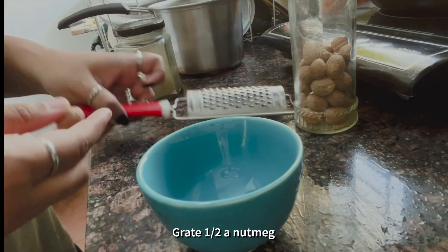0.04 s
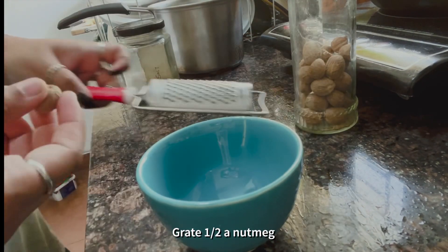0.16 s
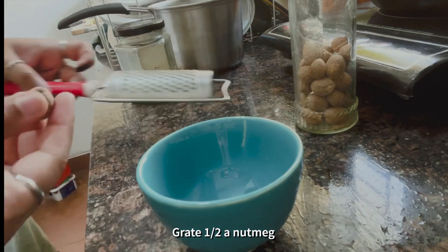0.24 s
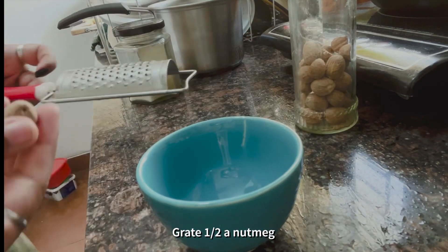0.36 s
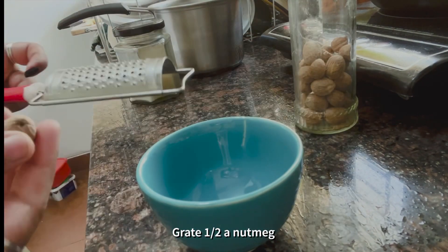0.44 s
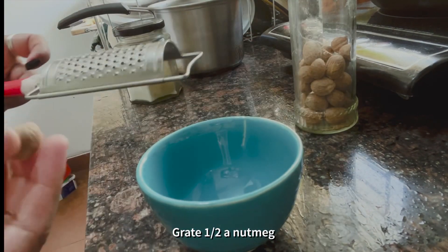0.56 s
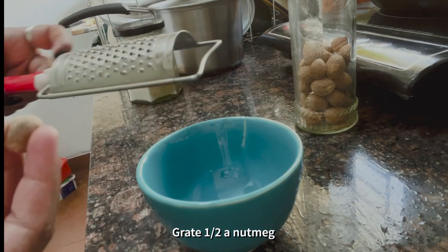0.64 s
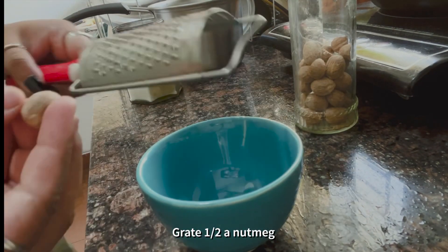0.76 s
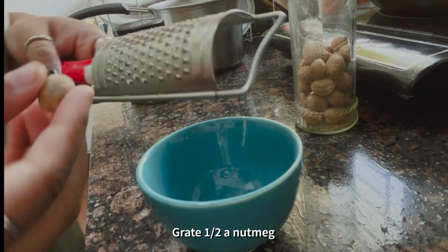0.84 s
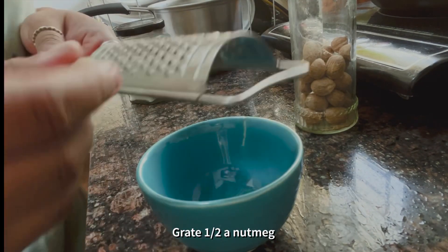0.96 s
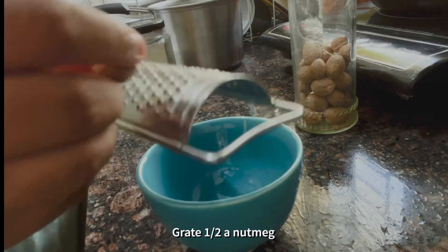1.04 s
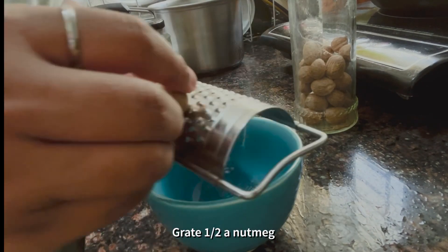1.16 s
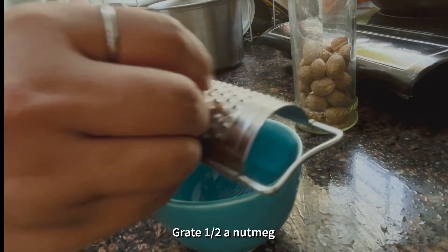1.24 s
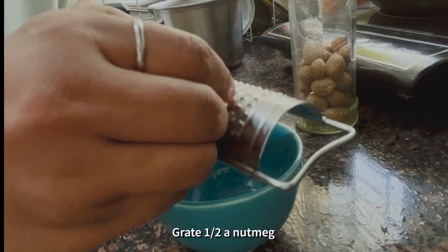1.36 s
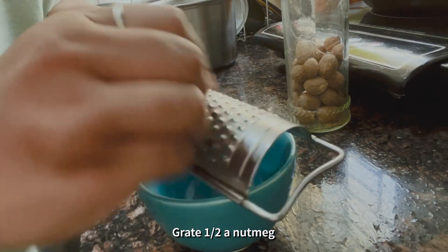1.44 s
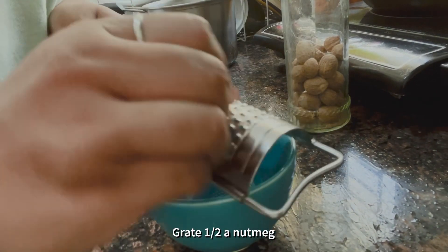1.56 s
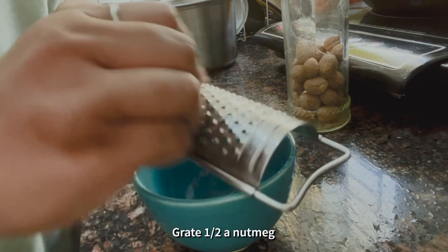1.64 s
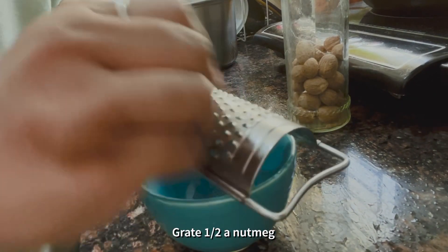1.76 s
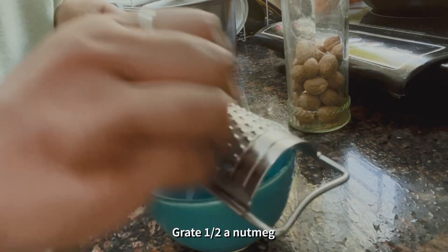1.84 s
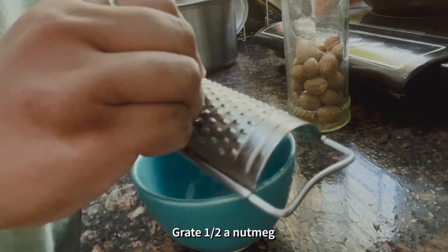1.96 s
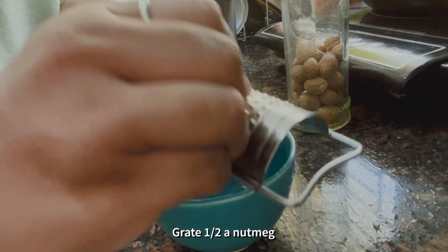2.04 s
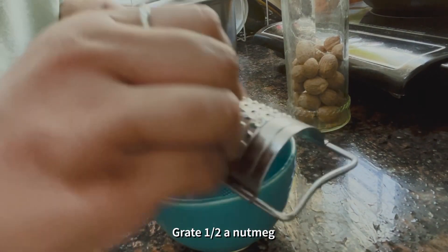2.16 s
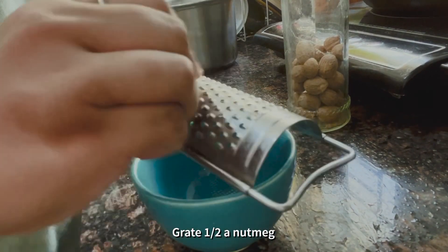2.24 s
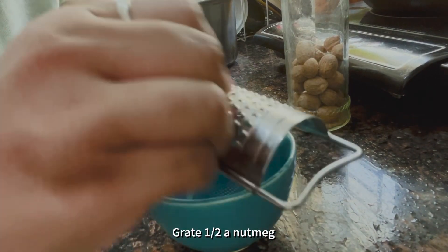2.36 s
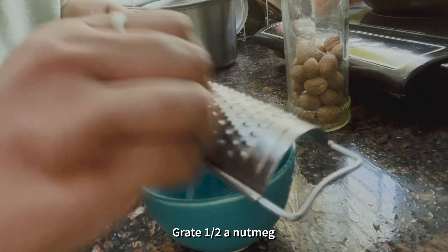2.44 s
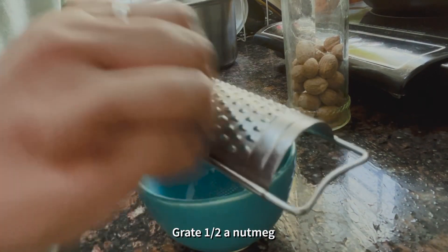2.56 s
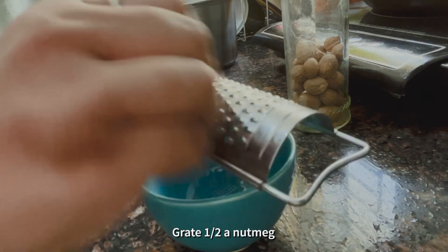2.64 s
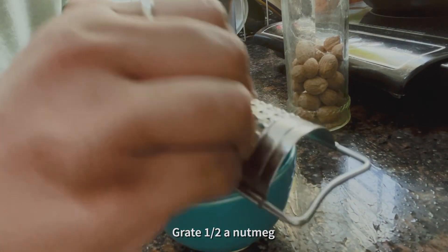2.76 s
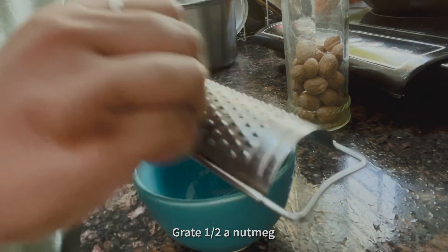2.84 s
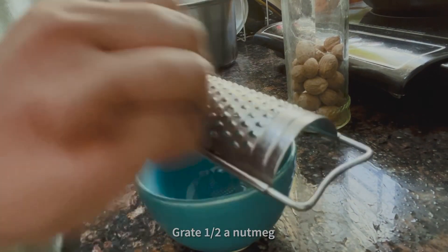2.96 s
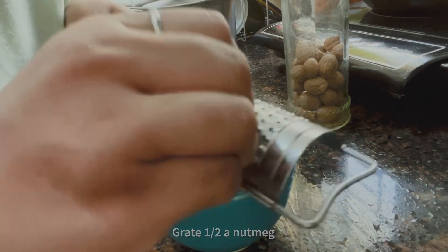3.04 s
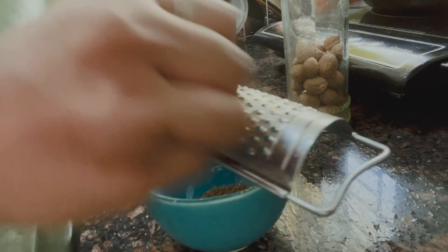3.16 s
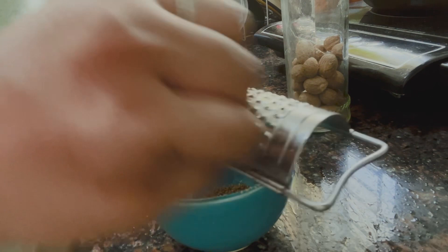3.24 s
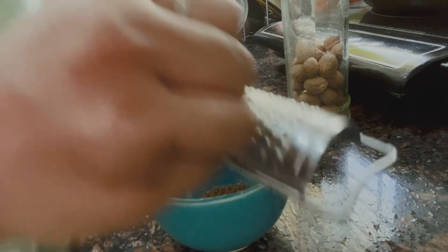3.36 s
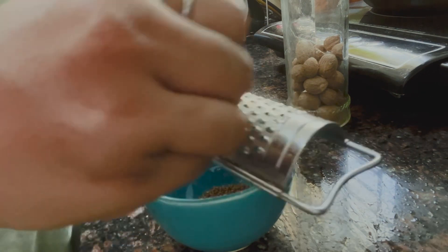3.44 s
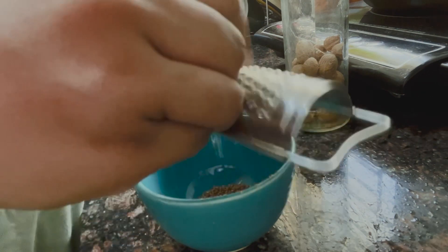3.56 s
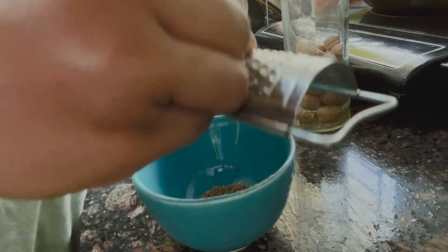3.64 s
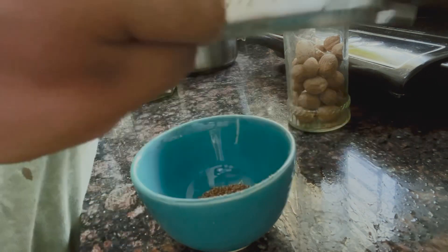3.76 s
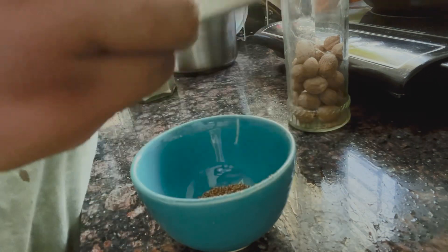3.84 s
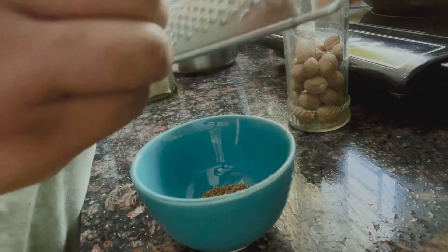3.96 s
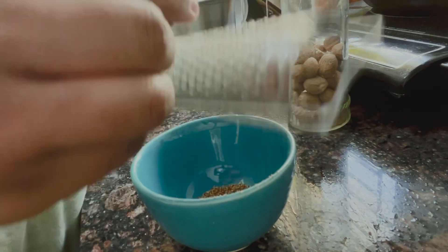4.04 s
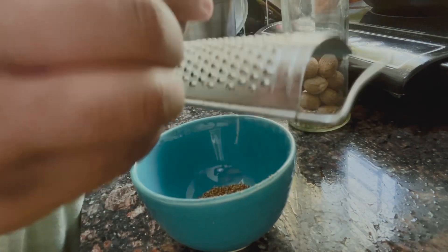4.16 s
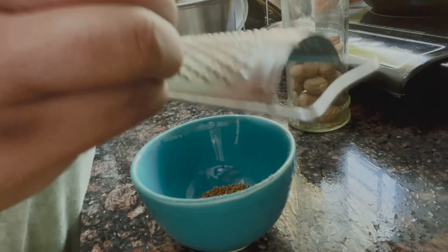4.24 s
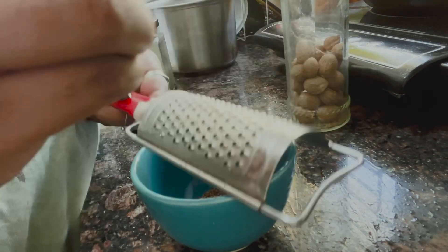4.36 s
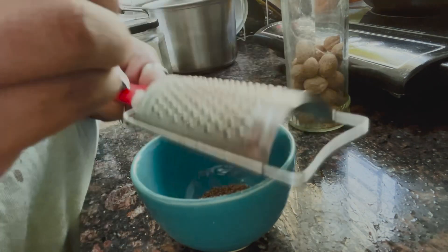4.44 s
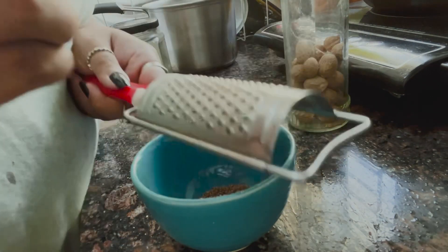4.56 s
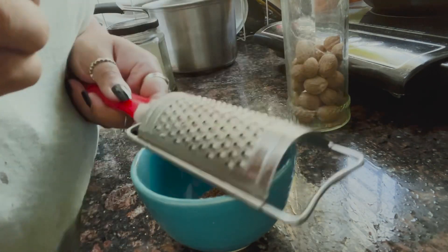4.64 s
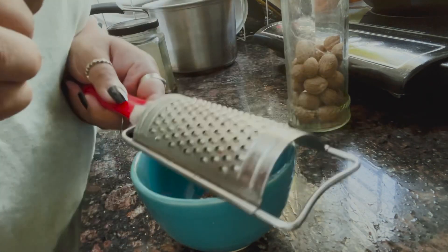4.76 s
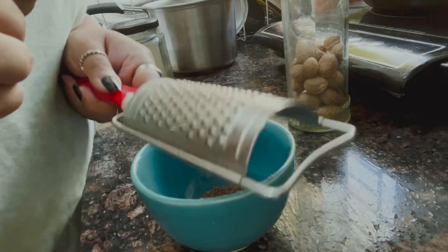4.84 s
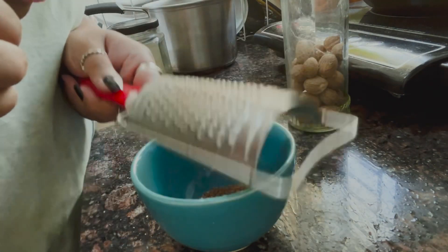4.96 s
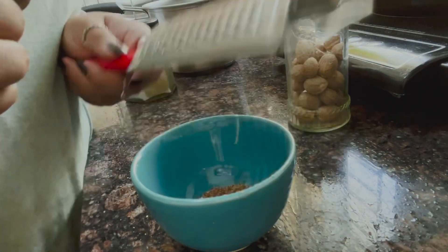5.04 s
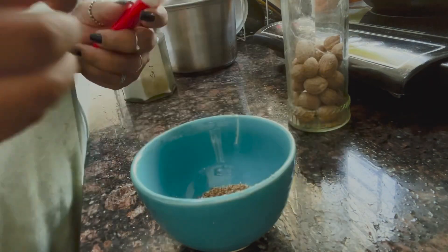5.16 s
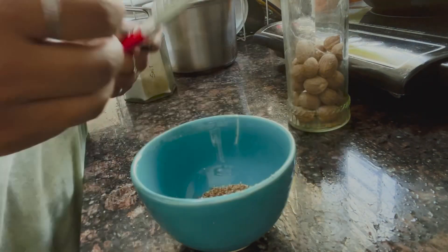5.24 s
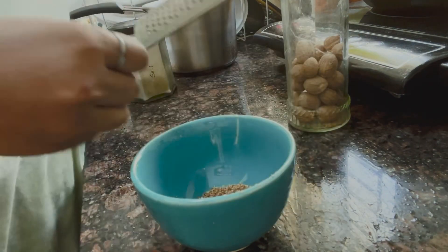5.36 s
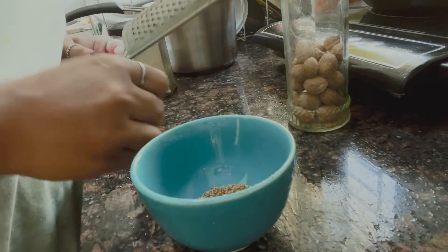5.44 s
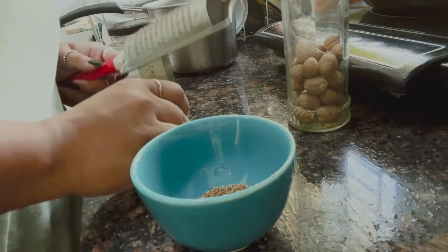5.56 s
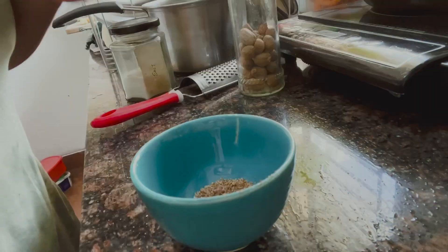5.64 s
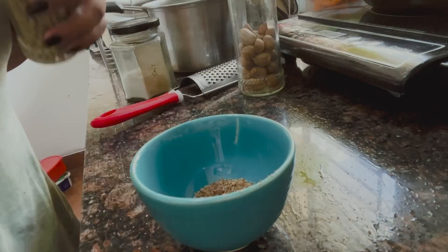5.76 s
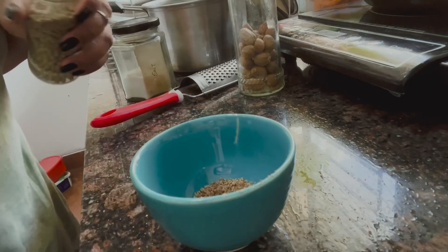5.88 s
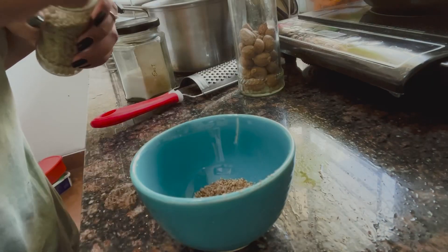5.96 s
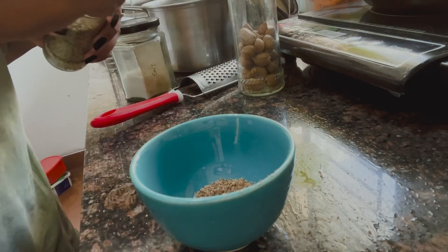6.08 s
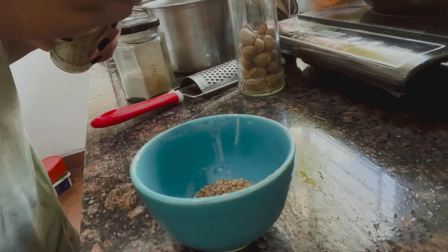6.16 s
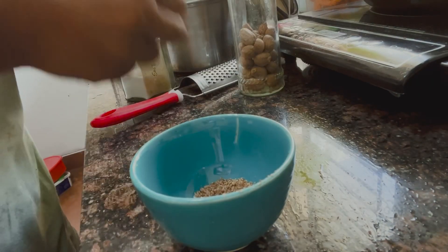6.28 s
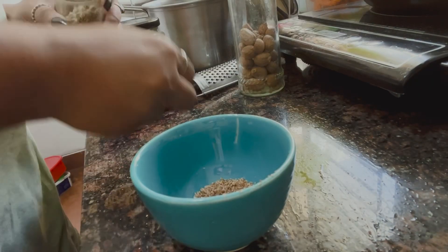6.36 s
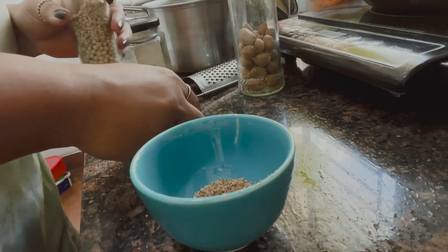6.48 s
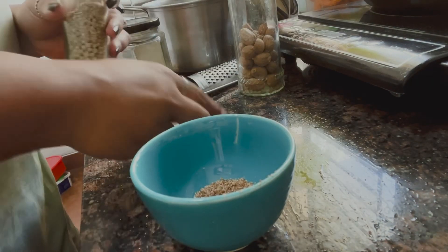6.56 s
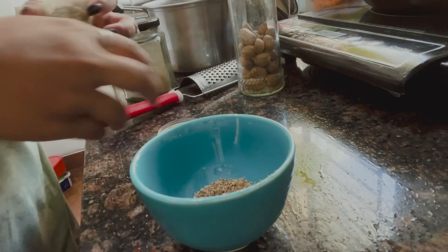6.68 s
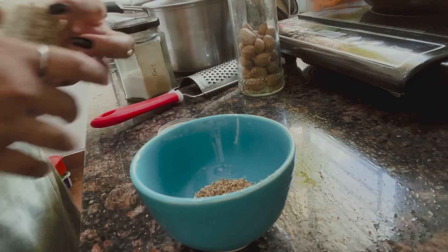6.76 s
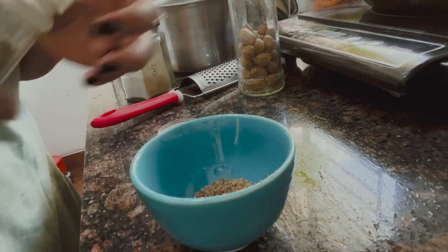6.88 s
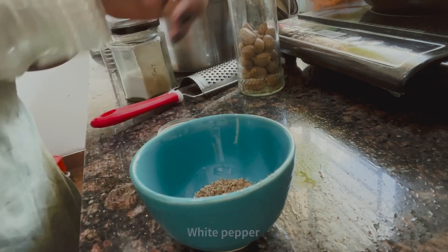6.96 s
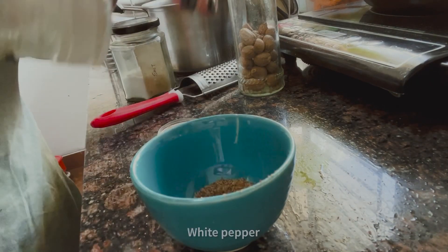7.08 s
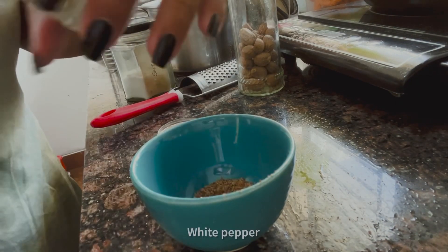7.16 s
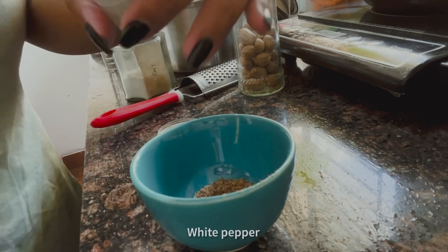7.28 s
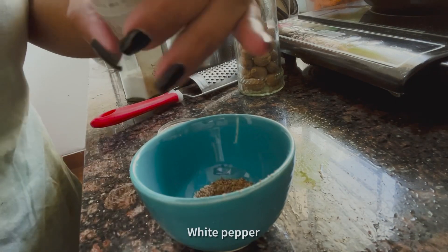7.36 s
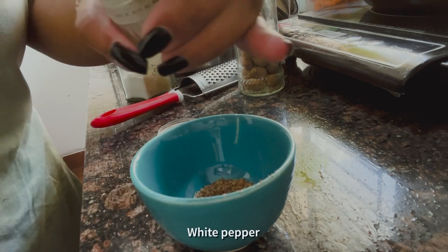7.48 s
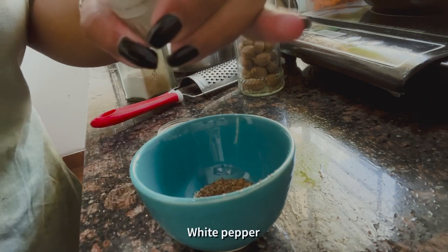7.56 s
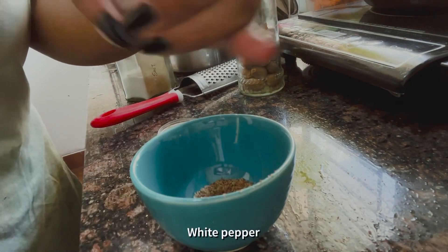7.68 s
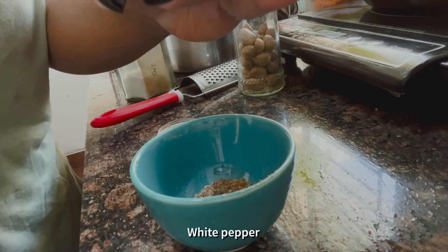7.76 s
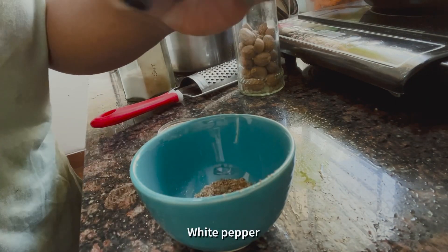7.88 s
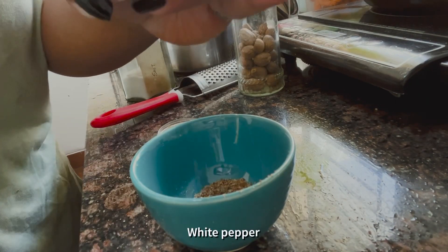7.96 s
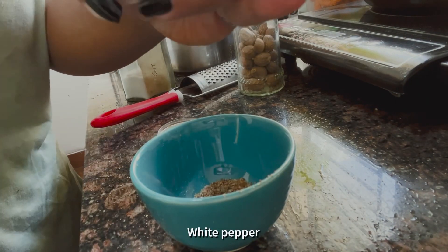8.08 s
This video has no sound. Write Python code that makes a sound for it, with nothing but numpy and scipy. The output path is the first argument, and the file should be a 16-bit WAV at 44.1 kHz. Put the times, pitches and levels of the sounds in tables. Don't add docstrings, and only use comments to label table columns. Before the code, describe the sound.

Close stereo pickup at a kitchen counter: a bright metallic bounce on stone, then about two seconds of fast, dry, gritty grating on thin metal, with catches and a few clanks against a ceramic bowl. Evenly spaced rim taps follow, then a metal clack as the grater is put down. Glass ticks, dull jar thuds and a lid rattle lead into a pepper mill's irregular cracks and thin squeaks, over faint low room rumble.

```python
import sys
import numpy as np
from scipy import signal
from scipy.fft import rfft, irfft, next_fast_len
from scipy.io import wavfile
from scipy.ndimage import uniform_filter1d

SR = 44100
rng = np.random.default_rng(int(sys.argv[2]) if len(sys.argv) > 2 else 0)


def dump_mix(stems):
    frames = np.atleast_2d(stems).T
    limited = np.clip(frames, -1, 1)
    pcm = np.round(limited * 32767).astype(np.int16)
    wavfile.write(sys.argv[1], SR, pcm)


def linear_from_db(decibels):
    return 10 ** (np.asarray(decibels, float) / 20)


N = 358091

# (frequency [Hz], density [dB per Hz])
RUMBLE_SPECTRUM = [(76, -7.5), (130, -4), (330, -4), (372, -6.5), (612, -11), (756, -14.5), (1310, -15),
                   (1750, -23), (3000, -27.5), (3900, -42), (6600, -120)]
# (frequency [Hz], likeness [0..1])
RUMBLE_LIKENESS = [(60, 1), (130, 1), (290, 0.77), (640, 0.013), (3000, 0.054)]
# (frequency [Hz], level [dB])
THRUM_SPECTRUM = [(15, -47.5), (30, -15), (70, -3), (100, 2.5), (125, -7.5), (170, -11.5), (400, -73)]
# (frequency [Hz], level [dB])
HISS_SPECTRUM = [(500, 6), (1500, -4), (3000, -1.5), (5000, -6.5), (8000, -8.5), (12000, -19), (14000, -21),
                 (16000, -26)]
# (time [s], level [dB])
LOAD = [(0, -48), (0.298, -46), (1.5, -44), (1.899, -40.5), (3.2, -45.5), (3.501, -49.5), (4.0, -49),
        (4.401, -58.5), (8.12, -52)]
# (time [s], length [s], level [dB])
RUSTLES = [(0, 0.023, -51), (1.6, 0.14, -72), (4.5, 0.29, -50), (6.2, 0.56, -55), (7.6, 0.36, -58)]
RUMBLE_DB, HISS_DB = -44.5, -57.5
HIGH_TONE_HZ, HIGH_TONE_DB = 14420, -81
LOAD_SHARE = 0.069
RUSTLE_RISE_DB_PER_S, RUSTLE_FALL_DB_PER_S = 100, 65

# (time [s], level [dB], ring level [dB], contact [s])
STONE_HITS = [
    (0.053, -6, -5.5, 0.0058),
    (0.0605, -14, 4, 0.0078),
    (0.066, -16.5, 1.5, 0.0072),
    (0.072, -19, -3, 0.01),
]
# (frequency [Hz], level [dB], t60 [s])
FRAME_MODES = [(596, -2.5, 0.065), (930, 1, 0.037), (2046, 0.5, 0.038), (1134, -0.5, 0.021),
               (2550, -11, 0.036), (4220, -14.5, 0.078), (4800, -16, 0.047), (5600, -7, 0.05),
               (6700, -18, 0.041), (8820, 7.5, 0.052), (9400, -12, 0.051), (10650, -17, .06),
               (11100, -11, 0.07)]
# (frequency [Hz], level [dB])
SLAP_SPECTRUM = [(300, -11.5), (1000, -10.5), (2700, -18), (5600, -9), (9000, -7), (11500, -8),
                 (13000, -20), (16500, -24.5)]
TWANG = 0, 0.34, 606.5, -17.5

# (time [s], force [dB], length [s], favoured pitch of the tin [Hz])
STROKES = [(1.439, -21, 0.06, 5430), (1.531, -17.5, 0.058, 3400), (1.622, -18, 0.037, 3560),
           (1.686, -15, 0.057, 4900), (1.778, -17, 0.044, 3600), (1.854, -5, 0.024, 4800),
           (1.932, -19.5, 0.044, 3430), (2.012, -14.5, 0.044, 4600), (2.076, -23, 0.061, 5200),
           (2.157, -22, 0.054, 5350), (2.234, -18, 0.045, 5200), (2.301, -14, 0.053, 5950),
           (2.386, -17, 0.042, 5600), (2.446, -17, 0.03, 5800), (2.514, -16.5, 0.049, 5000),
           (2.575, -12, 0.053, 5060), (2.659, -13.5, 0.04, 4800), (2.72, -17, 0.054, 5800),
           (2.788, -22, 0.06, 5230), (2.857, -10.5, 0.056, 4800), (2.941, -15, 0.042, 4600),
           (3.014, -7.5, 0.028, 4960), (3.088, -21, 0.043, 4830), (3.151, -13, 0.062, 4380),
           (3.237, -17.5, 0.053, 4600), (3.31, -16, 0.022, 5500)]
# (time [s], level [dB], pitch of the tin there [Hz])
CATCHES = [(1.124, -29, 5000), (1.4517, -16.5, 4600), (1.4807, -21, 4310), (1.5351, -15, 3540),
           (1.56, -16, 4240), (1.6497, -24, 3420), (1.785, -18, 4310), (1.8492, -17, 5110),
           (1.9395, -16.5, 3230), (1.952, -18.5, 3350), (2.014, -14, 4230), (2.044, -23.5, 4600),
           (2.103, -29, 5230), (2.143, -18, 3470), (2.167, -9, 5270), (2.1783, -16.5, 5400),
           (2.192, -18, 5300), (2.248, -13.5, 5200), (2.262, -25, 5200), (2.2965, -18, 5280),
           (2.3135, -14, 6300), (2.333, -17, 5200), (2.407, -13, 6290), (2.44, -24, 6800),
           (2.462, -15.5, 5500), (2.4776, -13.5, 5600), (2.55, -24, 4330), (2.583, -14, 4600),
           (2.5982, -16, 5470), (2.614, -21, 5360), (2.6745, -14, 4040), (2.7253, -26.5, 5300),
           (2.7439, -17, 6500), (2.756, -15, 5500), (2.806, -23, 5260), (2.8582, -23, 4250),
           (2.8825, -23, 4400), (2.898, -16, 5270), (2.948, -30, 4350), (3.003, -13.5, 5400),
           (3.028, -8.5, 4680), (3.04, -19, 4700), (3.1427, -23, 5000), (3.157, -8.5, 4250),
           (3.177, -11.5, 4600), (3.317, -30, 4730), (3.5086, -27, 6040)]
# (time [s], level [dB])
NICKS = [(1.9395, -26), (1.9503, -18), (2.0024, -20), (2.0344, -25), (2.0807, -34), (2.17, -18),
         (2.2472, -15), (2.3141, -10), (2.383, -23), (2.4046, -20), (2.465, -19), (2.4794, -24),
         (2.5454, -24), (2.5526, -27), (2.583, -13), (2.6004, -22), (2.675, -24), (2.7272, -26),
         (2.7477, -13), (2.807, -26), (2.8604, -25), (2.886, -14), (2.9507, -25), (3.0044, -25),
         (3.0115, -18), (3.028, -22), (3.0414, -23)]
# (frequency [Hz], level [dB])
SCRAPE_SPECTRUM = [(300, 0.5), (900, -18), (1700, 5), (2650, -4.5), (3300, 11.5), (3750, 2.5), (4500, -6.5),
                   (5700, -16), (8000, 8.5), (10000, 0.5), (12500, -8.5), (16500, -23.5)]
# (frequency [Hz], level [dB])
NICK_SPECTRUM = [(500, -17), (1500, -6), (2700, -15), (4500, 2), (6500, -2), (10500, -7), (13000, -8),
                 (16500, -20)]
# (frequency [Hz], width [Hz], level [dB])
TIN_RESONANCES = [(970, 170, -4.5), (1630, 370, -16.5), (2150, 210, -12), (3400, 196, 6), (4394, 330, 2),
                  (4680, 205, 1), (5260, 280, -3.5), (5800, 190, -8), (6430, 380, -0.5), (6800, 310, -3),
                  (7470, 310, -6), (9400, 350, -14.5), (11100, 4000, -5.5), (15260, 500, -12.5)]
PUSH_AT = 0.32
BITE_DB = -15.5
FAVOUR_DB, FAVOUR_OCTAVES = 2.5, 0.45
CATCH_RING_DB, CATCH_WIDTH_HZ, CATCH_T60_S = 2, 500, 0.023
NICK_RING_DB, NICK_DRY_DB, NICK_LAG_S = 4, -5, 0.0011
SLIDE = .05
GRATING_N = 4 * SR

# (time [s], level [dB], ring level [dB], contact [s], tin over bowl [dB per octave])
RIM_KNOCKS = [(1.681, -10.5, -2, 0.006, 1.8), (1.698, -6, -9.5, 0.002, 2.5),
              (1.8648, -4.5, -7.5, 0.0067, -0.5), (1.8764, -15, -22, 0.005, -8),
              (3.153, -13, -9.5, 0.0038, 5), (3.335, -1.5, -6.5, 0.0037, 2),
              (3.3469, -5, -8.5, 0.0033, -0.5), (4.362, 0.5, -15.5, 0.00094, 2),
              (4.3737, -17, 2, 0.0014, -2), (4.4916, -14, -9.5, 0.0095, -5), (4.501, -18.5, 4, 0.027, 4),
              (4.6292, 0.5, -15, 0.0025, 1.5), (4.6427, -19, -2, 0.0036, -3),
              (4.7545, -6.5, -6, 0.0094, 1.5), (4.765, -13.5, -2.5, 0.0043, -1),
              (4.8935, -15, 1, 0.024, -1.5), (4.9055, -11, -2.5, 0.0084, 0.7)]
# (frequency [Hz], level [dB], t60 [s])
BOWL_MODES = [(316, -1.5, 0.095), (550.5, -2, 0.083), (1204, -3, 0.13), (1392, 9, 0.076),
              (1520, 1.5, 0.065), (2081, 4.5, 0.14), (3190, 1, 0.099), (4215, -1, 0.078),
              (4600, 2.5, 0.053), (4830, -8.5, 0.058), (5060, -10, 0.072), (5600, -27, 0.064),
              (6725, -4, 0.15), (8540, 9, 0.057)]
# (frequency [Hz], level [dB])
KNOCK_SPECTRUM = [(200, -20.5), (1400, -0.5), (2700, 0.5), (4100, 1), (5000, 11), (6200, 0.5),
                  (10500, -0.5), (16500, -20.5)]
BOUNCE_S = .02
BOUNCE_DULL_DB, BOWL_RING_HZ = -7.5, 1400

# (time [s], length [s], start pitch [Hz], end pitch [Hz], level [dB])
SQUEAKS = [(4.01, .2, 3000, 3000, -56), (4.03, .27, 3320, 3320, -52), (4.08, .15, 3560, 3560, -57),
           (7.755, .085, 4730, 4750, -52), (7.83, .09, 4750, 4770, -56), (7.91, .13, 4770, 4900, -59),
           (8.045, .08, 5050, 5080, -53), (8.055, .04, 4800, 4800, -57), (7.93, .1, 10500, 10520, -58),
           (8.01, .11, 10520, 10520, -61)]
# (time [s], length [s], start pitch [Hz], end pitch [Hz], level [dB])
RASPS = [(7.02, .16, 6400, 6400, -60), (7.18, .16, 6400, 6450, -56), (5.904, .06, 6300, 6300, -57)]
SQUEAK_WOBBLE_HZ, RASP_WOBBLE_HZ = 30, 130

# (time [s], level [dB], ring level [dB], contact [s])
LAID = [
    (5.2799, -7, -6, 0.0079),
    (5.287, -20.5, -3, 0.036),
]
# (frequency [Hz], level [dB], t60 [s])
EDGE_MODES = [(624, -12, 0.2), (3230, -13, 0.075), (4230, -3, 0.065), (5000, -10, 0.048), (5670, 5, 0.058),
              (6200, 7, 0.052), (7350, -4, 0.053), (10800, 3, 0.038)]

# (time [s], level [dB], frequency [Hz], wide-band snap [dB])
TICKS = [(5.6303, -40, 2090, -1), (5.678, -41, 1990, -11), (5.903, -33, 6700, -9), (5.9782, -33, 9400, -17),
         (6.0192, -32.5, 2200, -23), (6.037, -39, 3060, -15), (6.5946, -44.5, 3130, 18),
         (6.6341, -25.5, 3540, -5), (6.8734, -34, 11100, -16), (6.952, -36, 6500, -9),
         (7.0498, -42, 6500, -3)]
# (time [s], level [dB], frequency [Hz], wide-band snap [dB])
CRACKS = [(7.1886, -37, 6360, -12), (7.2005, -27.5, 7100, -1), (7.2406, -22, 6300, -10),
          (7.265, -27.5, 6200, -11), (7.306, -32, 1940, 0), (7.3115, -35, 5400, -8),
          (7.3372, -43.5, 2150, 11), (7.413, -47, 11500, -8), (7.4222, -39, 6340, 4),
          (7.4581, -7, 9000, -8), (7.5129, -21.5, 6800, 8.5), (7.5245, -34, 6300, -1),
          (7.5305, -19.5, 6900, -2), (7.5385, -35, 6700, -14.5), (7.5684, -23, 10300, -2),
          (7.5742, -19.5, 10000, 12), (7.5776, -8.5, 9100, -7), (7.5934, -25, 6170, 12.5),
          (7.6032, -18, 2850, -9), (7.665, -39, 11000, -12), (7.672, -34, 5900, 9),
          (7.6947, -28, 2020, -22), (7.7125, -22, 10400, 3), (7.7183, -19, 5970, -12),
          (7.798, -38, 2490, 9), (7.81, -35, 11000, -10), (7.822, -33, 11200, -10),
          (7.8358, -24.5, 2370, 9.5), (7.8424, -22, 6430, -5), (7.8796, -15, 2100, -21),
          (7.89, -14, 2200, 6.5), (7.907, -26, 4500, 0), (7.98, -39, 6100, -15), (8.0151, -20, 2020, 5),
          (8.0365, -38, 5500, 1), (8.097, -39, 9000, 1)]
TICK_T60_S, CRACK_T60_S, SNAP_T60_S = 0.032, 0.023, 0.014

# (time [s], level [dB], frequency [Hz], t60 [s])
THUDS = [(5.718, -26.5, 340, 0.16), (6.038, -27.5, 367, 0.2), (6.121, -23, 220, 0.028),
         (6.355, -29.5, 367, 0.19), (6.408, -34, 326, 0.077)]
# (time [s], level [dB], ring level [dB], contact [s], pitch factor)
LID_RATTLES = [(6.128, -10, -6, 0.0024, 1.02), (6.132, -23.5, -4, 0.0081, 1.33),
               (6.268, -36, 9.5, 0.0035, 1.1), (6.282, -48, 5.5, .005, 1.1)]
# (frequency [Hz], level [dB], t60 [s])
LID_MODES = [(2150, 4, 0.016), (2490, 7.5, 0.11), (2655, 12.5, 0.15), (3760, -8, 0.072), (4700, -3, 0.13),
             (5320, -7, 0.096), (5900, -4, 0.15), (11000, -7, 0.22)]
# (time [s], level [dB], ring level [dB], contact [s])
CLINKS = [(6.4923, -33.5, 18, 0.0016)]
# (frequency [Hz], level [dB], t60 [s])
GLASS_MODES = [(3150, 0, .06), (4880, -4, .03), (6860, -8, .03), (9550, -18, .025)]

# (time [s], length [s], crunch level [dB])
MILL_TWISTS = [(6.88, 0.017, -60), (7.195, 0.086, -50.5), (7.24, 0.047, -60.5), (7.445, .012, -61),
               (7.52, 0.014, -50), (7.585, 0.022, -53), (7.675, 0.044, -47.5), (7.745, .015, -69),
               (7.842, 0.0061, -44.5), (7.888, 0.024, -44)]
# (frequency [Hz], level [dB])
CRUNCH_SPECTRUM = [(700, -12), (2000, 5), (4600, 0.5), (6500, 2), (8500, 6.5), (11000, -1.5), (13000, -14),
                   (16500, -26)]
# (frequency [Hz], width [Hz], level [dB])
MILL_BODY = [(2230, 790, -10), (4600, 170, 2), (6300, 230, 6.5), (10300, 1300, 0.5)]
GRIP_DB_PER_S, LET_GO_DB_PER_S = 506, 408

LEAD_S = .012
SOFT_S = 0.0036
SPIKE = 3.3
SPREAD_HZ = 3600
CLEAN_HZ, CLEAN_DB = 2470, -0.5
CLATTER_DB, CLATTER_T60_S = -49.5, 0.21

# (frequency [Hz], t60 [s])
ROOM_DECAY = [(200, 0.72), (1500, 0.26), (5000, 0.34), (12000, 0.26)]
# (frequency [Hz], phase [half turns])
LEFT_LAG = [(0, 0), (3100, 1), (4400, 2), (5600, 2), (6500, 1.7), (7850, 1.05), (8700, .95), (10750, 0),
            (13400, -1), (18500, -3)]
MONO_HZ, EDGE_HZ = 6300, 16900


def evened(x):
    return x / np.sqrt(np.mean(x ** 2) + 1e-20)


def peaked(x):
    return x / abs(x).max()


def read(points, hz):
    f, value = np.transpose(points)
    return np.interp(np.log(hz + 1), np.log(f + 1), value)


def add(mix, s, sound):
    part = mix[..., round(s * SR):][..., :sound.shape[-1]]
    part += sound[..., :part.shape[-1]]


def coloured(x, points):
    log_gain = np.log(linear_from_db(read(points, abs(np.fft.fftfreq(2048, 1 / SR)))))
    taps = np.fft.ifft(np.exp(np.conj(signal.hilbert(log_gain)))).real[:1024]
    taps = (taps / np.linalg.norm(taps)).reshape((1,) * (x.ndim - 1) + (-1,))
    return signal.oaconvolve(x, taps, axes=-1)[..., :x.shape[-1]]


def resonate(x, hz, width_hz):
    pole = np.exp((2j * np.pi * hz - np.pi * width_hz) / SR)
    return 2 * signal.lfilter([1 - abs(pole)], [1, -pole], x).real


def resonate_twice(x, hz, width_hz):
    return resonate(resonate(x, hz, width_hz), hz, width_hz)


def glide(x, hz, width_hz):
    turn = np.exp(2j * np.pi * np.cumsum(hz) / SR)
    r = np.exp(-np.pi * width_hz / SR)
    return 2 * (turn * signal.lfilter([1 - r], [1, -r], x / turn)).real


def wander(rate_hz):
    knots = rng.standard_normal(8000)
    return np.interp(np.arange(N) * rate_hz / SR, np.arange(8000), knots)


def swells(rows, rise_db_per_s, fall_db_per_s):
    t = np.arange(N) / SR
    gain = np.zeros(N)
    for s, length, db in rows:
        before, after = np.maximum(s - t, 0), np.maximum(t - s - length, 0)
        gain += linear_from_db(db - rise_db_per_s * before - fall_db_per_s * after)
    return gain


def grit(per_s, spread_db):
    size = linear_from_db(spread_db * np.minimum(rng.exponential(1, (2, N)), 4))
    size = size * rng.choice([-1., 1.], (2, N))
    a, b = size * (rng.random((2, N)) < per_s / SR)
    return evened(np.array([a, .65 * a + .75 * b]))


def air():
    frames, hz = N // 256 + 5, np.fft.rfftfreq(1024, 1 / SR)
    a, b, c, d, patches = rng.standard_normal((frames, 513, 5)).T
    patches = evened(uniform_filter1d(uniform_filter1d(patches, 8, 0), 12, 1))
    same = np.clip(read(RUMBLE_LIKENESS, hz), 0, 1)[:, None]
    left = a + 1j * b
    right = same * left + np.sqrt(1 - same ** 2) * (c + 1j * d)
    z = np.array([left, right]) * linear_from_db(read(RUMBLE_SPECTRUM, hz)[:, None] + 2.5 * patches)
    rumble = evened(signal.istft(z, nperseg=1024, noverlap=768)[1][:, :N])

    shared, own = rng.standard_normal((2, N))
    thrum = np.array([.75 * shared + .5 * own, shared - .5 * own])
    thrum_gain = linear_from_db(read(THRUM_SPECTRUM, np.fft.rfftfreq(N, 1 / SR)))
    thrum = evened(irfft(rfft(thrum) * thrum_gain, N)) * linear_from_db(5.7 * wander(rate_hz=5.7))

    hiss = coloured(rng.standard_normal((2, N)), HISS_SPECTRUM) * linear_from_db(1.2 * wander(rate_hz=36.0))
    busy = linear_from_db(HISS_DB) + swells(RUSTLES, RUSTLE_RISE_DB_PER_S, RUSTLE_FALL_DB_PER_S)
    whine = linear_from_db(HIGH_TONE_DB) * evened(resonate_twice(own, HIGH_TONE_HZ, 60.))
    load = linear_from_db(np.interp(np.arange(N) / SR, *np.transpose(LOAD)))
    rumble = rumble * linear_from_db(RUMBLE_DB) * evened(load ** LOAD_SHARE)
    return rumble + hiss * busy + thrum * load + whine


def strike(db, ring_db, contact_s, modes, colour, blur_hz, rise_s):
    t = np.arange(10000) / SR - LEAD_S
    shared, own = rng.standard_normal(len(t)), rng.standard_normal((2, len(t)))
    noise = shared + .9 * own
    onset = np.clip(t / max(.0007, .4 * (contact_s - SOFT_S)), 0, 1)
    blow = linear_from_db(-60 * t / (3 * contact_s)) * onset
    smear = (t < .001) * np.clip(contact_s / 0.0037, .15, 1.6) * linear_from_db(-26.0 + 2100.0 * t)
    spike = SPIKE * min(SOFT_S / contact_s, 1) ** 2 * (abs(t - .0007) < .5 / SR)
    crack = coloured(spike + noise * (blow + smear), colour)

    ring = np.zeros((2, len(t)))
    for (hz, level_db, t60), chance in zip(modes, rng.standard_normal(len(modes))):
        cluster = evened(resonate_twice(noise, hz, blur_hz * max(hz / SPREAD_HZ, 1)))
        ring += linear_from_db(level_db + 2 * chance - 60 * t / t60) * cluster
        if hz < CLEAN_HZ:
            partial = np.sin(2 * np.pi * hz * (1 + 0.0093 * chance) * t)
            ring += linear_from_db(level_db + CLEAN_DB - 60 * t / t60) * partial
    clatter = linear_from_db(CLATTER_DB - 60 * t / CLATTER_T60_S) * coloured(noise, colour)
    ring = ring + abs(ring).max() * clatter
    ring = ring * (1 - np.exp(-np.maximum(t, 0) / rise_s))
    return linear_from_db(db) * (peaked(crack) + linear_from_db(ring_db) * peaked(ring))


def stone_landing():
    out = np.zeros((2, N))
    for s, *row in STONE_HITS:
        add(out, s - LEAD_S, strike(*row, FRAME_MODES, SLAP_SPECTRUM, blur_hz=112.0, rise_s=0.0075))
    s, swell_s, hz, db = TWANG
    u = np.arange(4000) / SR / swell_s
    tone = np.sin(2 * np.pi * hz * swell_s * u)
    add(out, s, linear_from_db(db) * (u * np.exp(1 - u)) ** 2 * tone * np.ones((2, 1)))
    return out


def grating():
    force, catches, nicks = np.zeros(N), np.zeros((2, N)), np.zeros((2, N))
    for s, db, length, hz in STROKES:
        u = np.arange(0, 1.2, 1 / (length * SR))
        push = np.interp(u, [0, .08, PUSH_AT, .9, 1, 1.2], [0, 0.11, 0.5, 0.45, 0.26, 0])
        add(force, s - .004, linear_from_db(db - 11.5) * push)

    t = np.arange(800) / SR
    bites = [(s, db + BITE_DB, hz) for s, db, length, hz in STROKES]
    for s, db, hz in CATCHES + bites:
        snap = rng.standard_normal(len(t)) + 0.92 * rng.standard_normal((2, len(t)))
        snap = snap * linear_from_db(-60 * t / CATCH_T60_S)
        snap = snap + linear_from_db(CATCH_RING_DB) * resonate(snap, hz, CATCH_WIDTH_HZ)
        add(catches, s, linear_from_db(db - 11.0) * np.minimum(t * 2000, 1) * snap)

    nick = peaked(coloured(signal.unit_impulse((2, 300), (slice(None), 0)), NICK_SPECTRUM))
    for s, db in NICKS:
        add(nicks, s + NICK_LAG_S, linear_from_db(db + NICK_DRY_DB) * nick)
        add(catches, s + NICK_LAG_S, linear_from_db(db + NICK_RING_DB) * np.array([[1., -0.5], [1., -0.22]]))

    judder = linear_from_db(3.5 * wander(rate_hz=170.))
    teeth = grit(per_s=3500., spread_db=3.3)
    drive = (teeth * force * judder + catches)[:, :GRATING_N]

    starts, favoured_hz = np.array(STROKES)[:, 0], np.array(STROKES)[:, 3]
    stroke = np.maximum(np.searchsorted(starts, np.arange(GRATING_N) / SR) - 1, 0)
    tin = np.zeros((2, GRATING_N))
    for k, (hz, width_hz, db) in enumerate(TIN_RESONANCES):
        lift_db = FAVOUR_DB * np.exp(-(np.log2(hz / favoured_hz) / FAVOUR_OCTAVES) ** 2)
        move = wander(rate_hz=18.)
        drift = linear_from_db(lift_db[stroke] + 4 * np.tanh(move[:GRATING_N]))
        pitch_hz = hz * (1 + SLIDE * np.tanh(move[-GRATING_N:]))
        tin += (-1) ** k * linear_from_db(db) * drift * glide(drive, pitch_hz, max(width_hz, 220))
    sound = linear_from_db(-3.0) * coloured(drive, SCRAPE_SPECTRUM) + linear_from_db(3.0) * tin
    return nicks + np.pad(sound, [(0, 0), (0, N - GRATING_N)])


def rim_knocks():
    out = np.zeros((2, N))
    dull = [(hz, db + BOUNCE_DULL_DB * max(np.log2(hz / BOWL_RING_HZ), 0)) for hz, db in KNOCK_SPECTRUM]
    gaps_s = np.diff([0] + [row[0] for row in RIM_KNOCKS])
    for (s, *row, tilt_db), gap_s in zip(RIM_KNOCKS, gaps_s):
        modes = [(hz, db + tilt_db * np.log2(hz / 2500), t60) for hz, db, t60 in BOWL_MODES]
        colour = dull if gap_s < BOUNCE_S else KNOCK_SPECTRUM
        add(out, s - LEAD_S, strike(*row, modes, colour, blur_hz=174.0, rise_s=0.0016))
    return out


def squeaks():
    out = np.zeros((2, N))
    for rows, wobble_hz in (SQUEAKS, SQUEAK_WOBBLE_HZ), (RASPS, RASP_WOBBLE_HZ):
        for s, length, hz, end_hz, db in rows:
            slips = uniform_filter1d(rng.standard_normal((2, SR // 2)), 200)[:, :round(length * SR)]
            pitch_hz = np.linspace(hz, end_hz, slips.shape[1]) + wobble_hz * evened(slips[0])
            tone = np.sin(2 * np.pi * np.cumsum(pitch_hz) / SR) * linear_from_db(3.8 * evened(slips[1]))
            add(out, s, linear_from_db(db) * tone * signal.windows.tukey(len(tone), .4) * np.ones((2, 1)))
    return out


def laying_down():
    out = np.zeros((2, N))
    for s, *row in LAID:
        add(out, s - LEAD_S, strike(*row, EDGE_MODES, SLAP_SPECTRUM, blur_hz=307.0, rise_s=0.00055))
    return out


def tick(db, hz, t60_s, snap_db, sharp, spike=0):
    t = np.arange(9000) / SR
    burst = rng.standard_normal(len(t)) + rng.standard_normal((2, len(t)))
    burst = burst * linear_from_db(-60 * t / t60_s) + spike * (t == 0)
    tone = resonate_twice(burst, hz, hz / sharp)
    snap = coloured(burst * linear_from_db(-60 * t / (t60_s + SNAP_T60_S)), CRUNCH_SPECTRUM)
    return linear_from_db(db) * (peaked(tone) + linear_from_db(snap_db) * peaked(snap))


def ticks_and_cracks():
    out = np.zeros((2, N))
    for rows, t60_s in (TICKS, TICK_T60_S), (CRACKS, CRACK_T60_S):
        for s, db, hz, snap_db in rows:
            add(out, s, tick(db, hz, t60_s, snap_db, sharp=2.13, spike=5.6))
    return out


def jars_and_lids():
    out = np.zeros((2, N))
    for s, db, hz, t60_s in THUDS:
        add(out, s - .001, tick(db, hz, t60_s, -57, sharp=1.4))
        add(out, s - .001, tick(db - 0.5, 1.24 * hz, t60_s, -51, sharp=1.4))
    for s, *row, pitch in LID_RATTLES:
        modes = [(hz * pitch, db, t60) for hz, db, t60 in LID_MODES]
        add(out, s - LEAD_S, strike(*row, modes, CRUNCH_SPECTRUM, blur_hz=387.0, rise_s=0.0027))
    for s, *row in CLINKS:
        add(out, s - LEAD_S, strike(*row, GLASS_MODES, CRUNCH_SPECTRUM, blur_hz=137.0, rise_s=0.00021))
    return out


def mill():
    clumps = linear_from_db(3 * wander(rate_hz=110.))
    grains = grit(per_s=3400.0, spread_db=4.0)
    body = sum(linear_from_db(db + 7.0) * resonate(grains, hz, width_hz) for hz, width_hz, db in MILL_BODY)
    twists = swells(MILL_TWISTS, GRIP_DB_PER_S, LET_GO_DB_PER_S)
    return (coloured(grains, CRUNCH_SPECTRUM) + body) * twists * clumps


def kitchen(x):
    taps = np.zeros((2, SR // 2))
    slots = np.arange(150, SR // 2 - 20, 20)
    at = slots + rng.integers(0, 20, (2, len(slots)))
    np.put_along_axis(taps, at, rng.choice([-1., 1.], at.shape), 1)
    hz, t, z = signal.stft(taps, SR, nperseg=256)
    decay = linear_from_db(-60 * t / read(ROOM_DECAY, hz)[:, None])
    tail = signal.istft(z * decay, SR, nperseg=256)[1]
    return signal.fftconvolve(x, tail / np.linalg.norm(tail[0]), axes=1)[:, :N]


def scene():
    right = linear_from_db(np.array([[-1.2], [1.2]]))
    knocks = (stone_landing() + rim_knocks() + laying_down() + jars_and_lids()) * right
    scrape = grating() * right
    close = squeaks() + ticks_and_cracks() + mill()
    echoes = kitchen(linear_from_db(-11.5) * scrape + linear_from_db(-9.5) * knocks + linear_from_db(-11.5) * close)
    return scrape + knocks + close + echoes + air()


def low_pass(x):
    return signal.sosfilt(signal.butter(12, 16980, fs=SR, output="sos"), x)


def record(dry):
    size = next_fast_len(N + 64)
    hz = np.fft.rfftfreq(size, 1 / SR)
    limited = .9 * np.tanh(dry / .9)
    left, right = rfft(limited, size) * np.clip((EDGE_HZ - hz) / 800, 0, 1) ** 2
    mono = np.clip((hz - MONO_HZ) / 900 + .5, 0, .994)
    right = np.sqrt(1 - mono ** 2) * right + mono * left
    phase = np.pi * np.interp(hz, *np.transpose(LEFT_LAG))
    phase = phase - 0.067 * mono * np.sin(2 * phase)
    mix = irfft(np.array([left * np.exp(-1j * phase), right]), size)[:, :N]
    return low_pass(mix)


dry = scene()
out = record(dry)
dump_mix(out)
```